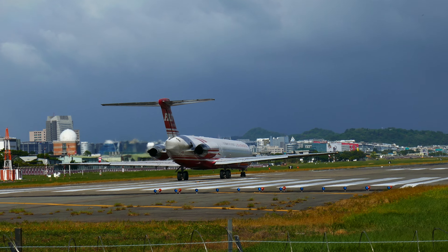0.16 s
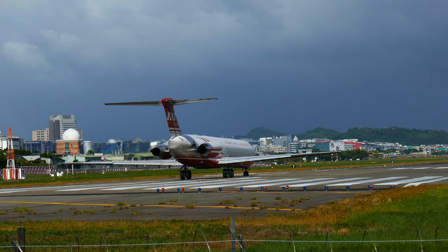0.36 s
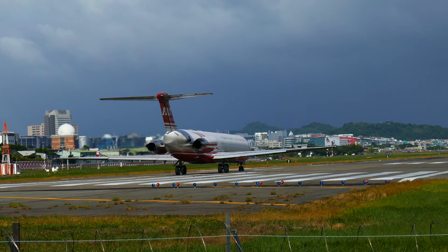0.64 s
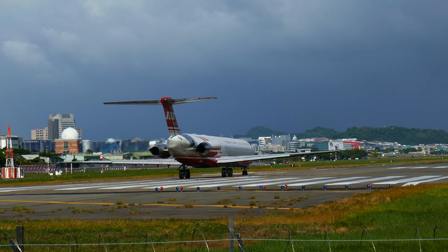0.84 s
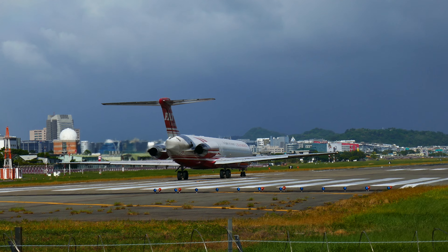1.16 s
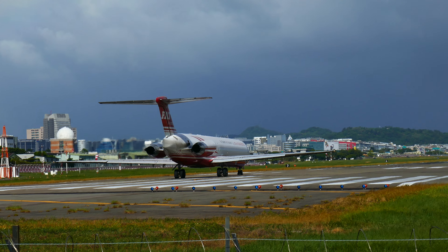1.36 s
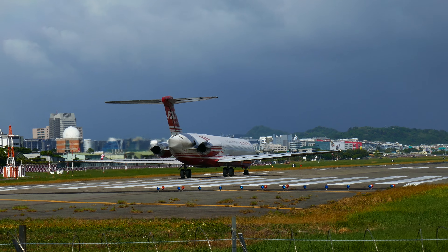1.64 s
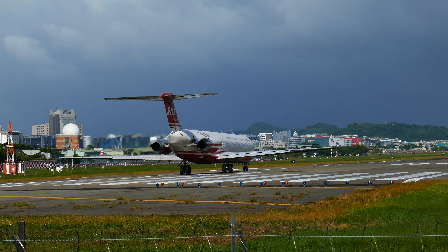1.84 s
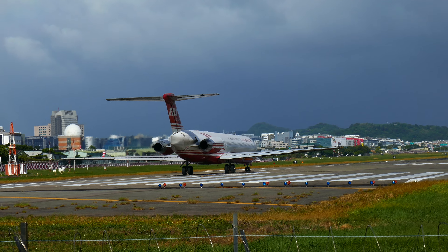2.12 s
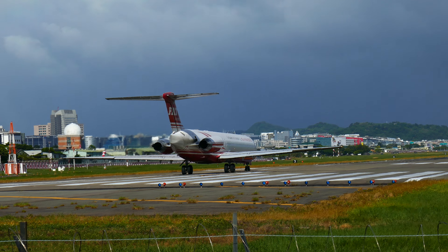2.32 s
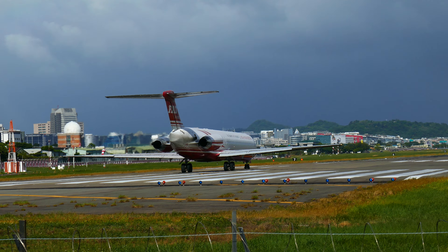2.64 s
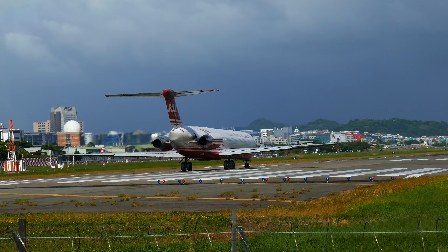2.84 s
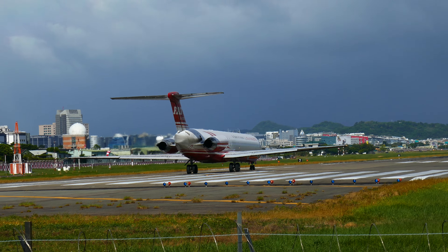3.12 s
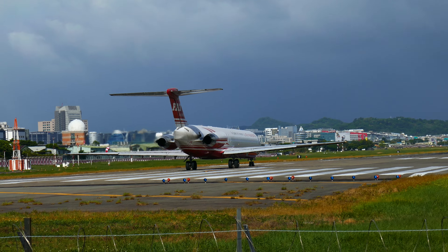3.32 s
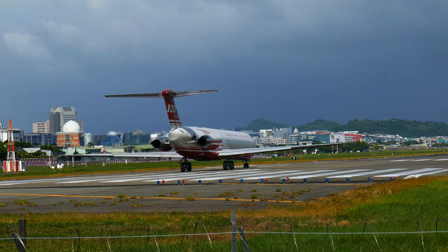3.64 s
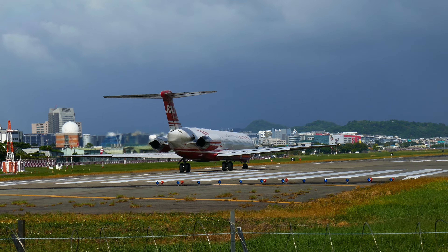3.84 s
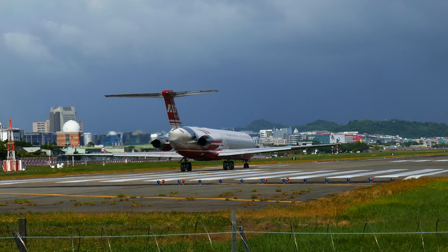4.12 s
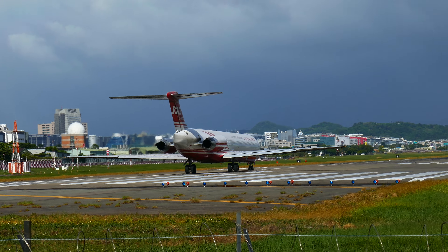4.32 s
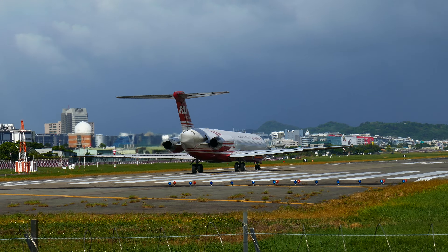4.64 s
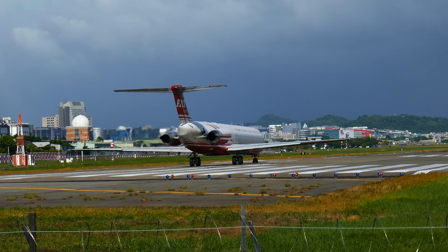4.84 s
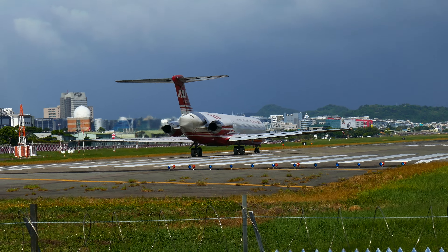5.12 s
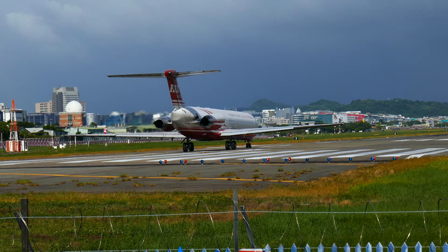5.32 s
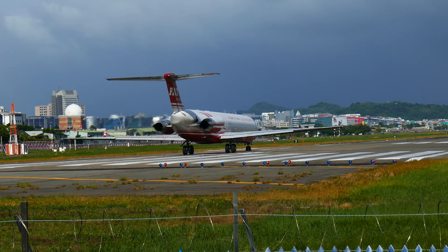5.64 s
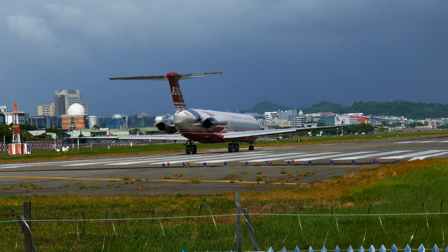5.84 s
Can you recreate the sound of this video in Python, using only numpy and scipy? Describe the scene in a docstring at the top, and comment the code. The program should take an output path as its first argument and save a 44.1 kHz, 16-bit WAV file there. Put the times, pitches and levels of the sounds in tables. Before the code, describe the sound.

A twin-engined airliner taxis on an open airfield, heard from some distance by a stereo microphone in gusty wind. Throughout, several close, steady-pitched whines around 1.7 to 2.4 kHz flicker independently, with fainter breathy overtones near 4 kHz, over broad fan hiss and a low-mid exhaust roar. From 0 to 1.3 s, dense low wind puffs thump and flap, strongest near 0.5 s, when the engine sound dips briefly and recovers. Wind eases from 1.5 to 2.3 s and the whine shows clearly. At 2.5 s a strong gust batters the microphone, with another brief dip, and buffeting continues to 3.4 s. Scattered thumps follow from 3.7 to 4.1 s, with a dip near 3.9 s. From about 4.6 s roar, hiss and whine swell, peaking around 5.6 to 5.9 s, the whine piercing. Isolated puffs come at 5.4 s and from 5.8 s to the end.

```python
"""Taxiing airliner in gusty wind

A twin-engined airliner taxis across an open airfield, heard at a stereo microphone in the wind.
Each compressor stage sings at shaft speed times its blade count, the two engines a little apart.
Shaped noise makes the exhaust roar and fan hiss beneath, which swell as the tail turns. Gusts buffet
the microphone ports in puffs; after some strong ones the recorder's gain drops briefly, heard in the
roar, the hiss and the tones riding on it."""
import sys
import numpy as np
from scipy import signal
from scipy.fft import rfft, irfft, next_fast_len
from scipy.io import wavfile
from scipy.ndimage import uniform_filter1d

SR = 44100
rng = np.random.default_rng(int(sys.argv[2]) if len(sys.argv) > 2 else 0)


def unload_wav(signal):
    """Save mono or channel-first audio to the path in sys.argv[1] as 16-bit WAV at rate SR, clipped to [-1, 1]."""
    wavfile.write(
        sys.argv[1],
        SR,
        np.round(np.clip(np.atleast_2d(signal).T, -1, 1) * 32767).astype(np.int16),
    )


N = 263718
NEAR_SHAFT_HZ, FAR_SHAFT_HZ = 70.9, 69.73   # the near engine is the louder


def from_db(db):
    """Decibels to gain."""
    return 10 ** (np.asarray(db) / 20)


def rms_one(x):
    """Scale to unit rms."""
    return x / np.sqrt(np.mean(x ** 2) + 1e-20)


def in_time(rows):
    """Columns of a curve table, one value per sample."""
    s, *columns = np.transpose(rows)
    return [np.interp(np.arange(N) / SR, s, column) for column in columns]


def at_hz(points, hz):
    """Read a spectrum on a log-frequency axis."""
    table_hz, values = np.array(points).T
    return np.interp(np.log(hz), np.log(table_hz), values)


def filtered(x, order, hz, kind):
    """Butterworth filter, run forward."""
    return signal.sosfilt(signal.butter(order, hz, kind, fs=SR, output="sos"), x)


def high_part(x, hz):
    """What lies above a frequency, without shifting it in time."""
    return signal.sosfiltfilt(signal.butter(2, hz, "high", fs=SR, output="sos"), x)


def drift(rate_hz):
    """Slow chance: noise through a double one-pole low-pass, run in; spread 1."""
    step = 40  # samples between drawn points
    r = np.exp(-2 * np.pi * rate_hz * step / SR)
    noise = rng.standard_normal(N // step + 2002)
    slow = signal.lfilter([1], [1, -2 * r, r * r], noise)[2000:]
    return np.interp(np.arange(N) / step, np.arange(len(slow)), rms_one(slow))


def coloured(spectrum, count):
    """Spectra of unrelated noises with the given colour, their frequencies and length."""
    size = next_fast_len(N)
    hz = np.maximum(np.arange(size // 2 + 1) * SR / size, 1)
    white = rfft(rng.standard_normal((count, size)))
    return white * from_db(at_hz(spectrum, hz)), hz, size


def tone(hz, waver_hz, level_db):
    """A blade-passing sine; the path through moving air shakes its phase."""
    cycles = np.cumsum(hz + waver_hz * drift(4)) / SR + rng.random()
    return np.sqrt(2) * from_db(level_db) * np.sin(2 * np.pi * cycles)


def twinkling_tones(shaft_hz, orders, over_db, level_db, waver_hz, twinkle_db):
    """Tones at multiples of shaft speed, each twinkling alone; higher ones waver more."""
    total = 0
    for order, db in zip(orders, over_db):
        tone_db = level_db + db + twinkle_db * drift(4)
        total = total + tone(order * shaft_hz, waver_hz * (order / 30) ** 2, tone_db)
    return total


# Loudest compressor stages of the near engine, 24, 28, 31 and 33 blades,
# swelling and fading in the moving air: (time [s], level [dB rms])
STAGE_24_BLADES = [(0.0, -55), (0.1, -48.5), (0.18, -63), (0.32, -45.5), (0.51, -52), (0.58, -62),
                   (0.9, -52.5), (1.2, -51.5), (1.3, -70), (1.33, -61), (1.55, -72), (1.63, -50),
                   (1.96, -59), (2.05, -48), (2.53, -52), (2.63, -70), (3.2, -48.5), (3.28, -68),
                   (3.6, -44.5), (4.38, -60), (4.41, -48), (4.63, -62), (4.88, -47.5), (5.3, -63),
                   (5.38, -42), (5.45, -56), (5.65, -32.5), (5.9, -40), (5.98, -60)]
STAGE_28_BLADES = [(0.0, -48), (0.13, -58), (0.23, -46), (0.7, -53), (0.75, -67), (0.98, -62), (1.15, -44),
                   (1.32, -45.5), (1.37, -55), (1.65, -47.5), (1.72, -71), (2.3, -47), (2.53, -52),
                   (3.46, -44), (3.7, -48.5), (3.81, -41), (4.18, -45.5), (4.4, -35), (4.46, -46.5),
                   (4.66, -36), (5.0, -37), (5.28, -53), (5.36, -37.5), (5.5, -71), (5.58, -45),
                   (5.93, -32), (5.98, -39)]
STAGE_31_BLADES = [(0.0, -53), (0.22, -44), (0.51, -71), (0.55, -75), (0.65, -48), (1.38, -63), (1.5, -44),
                   (1.82, -62), (1.9, -42.5), (2.16, -52), (2.25, -39.5), (2.46, -64), (2.65, -45),
                   (2.76, -66), (3.26, -45.5), (3.3, -55), (3.6, -41), (3.93, -52), (4.1, -39.5),
                   (4.63, -55), (4.75, -41.5), (4.88, -55), (5.03, -39), (5.09, -63), (5.3, -39),
                   (5.48, -75), (5.91, -37), (5.98, -41)]
STAGE_33_BLADES = [(0.0, -66), (0.1, -57), (0.17, -47), (0.3, -61), (0.51, -58), (0.58, -73), (1.01, -76),
                   (1.58, -47.5), (1.68, -57), (1.86, -49), (2.03, -66), (2.16, -43.5), (2.71, -53),
                   (2.75, -65), (3.51, -45.5), (3.61, -65), (3.71, -50), (3.78, -56), (3.83, -45),
                   (3.96, -57), (4.38, -50), (4.53, -41), (4.78, -47.5), (4.85, -38), (5.33, -52),
                   (5.56, -43), (5.68, -34.5), (5.98, -37.5)]


def loud_stages(waver_hz, flicker_db):
    """The stages that stand out of the whine: sines at blade count times shaft speed, swells rounded."""
    levels = []
    for stage in (STAGE_24_BLADES, STAGE_28_BLADES, STAGE_31_BLADES, STAGE_33_BLADES):
        s, db = np.transpose(stage)
        root_gain = np.interp(np.arange(N) / SR, s, from_db(db / 2))
        rounded = uniform_filter1d(root_gain, size=1500)  # samples
        levels.append(2 * 20 * np.log10(rounded))
    # the 34-blade stage swells with its neighbour, under it
    levels.append(levels[-1] - 8.5 + 3 * drift(2.5))
    total = 0
    for blades, db in zip((24, 28, 31, 33, 34), levels):
        total = total + tone(blades * NEAR_SHAFT_HZ, waver_hz, db + flicker_db * drift(6))
    return total


# Whine high over the blade tones:
# (time [s], level near 4 kHz that breath and overtones are set against [dB], highest overtones' level [dB])
UPPER_WHINE = [(0.0, -71, -75), (0.5, -70, -76), (0.78, -91, -88), (0.82, -72, -75), (0.95, -75, -80),
               (1.25, -70, -71), (1.45, -66, -68), (2.03, -71, -70), (2.16, -63, -62), (2.65, -73, -77),
               (3.51, -73, -76), (3.73, -61, -64), (3.95, -72, -80), (4.38, -60, -74), (4.6, -76, -81),
               (4.96, -59, -59), (5.2, -63, -59), (5.51, -59.5, -68), (5.7, -56.5, -61), (5.98, -63, -62)]


def upper_whine():
    """Overtones that hold their pitch but break up, inside a breathy band of noise."""
    level_db, top_db = in_time(UPPER_WHINE)
    lines = twinkling_tones(NEAR_SHAFT_HZ, (56, 62), (-4, -12), level_db, waver_hz=.5, twinkle_db=3.2)
    lines += twinkling_tones(FAR_SHAFT_HZ, (56,), (-7,), level_db, waver_hz=.5, twinkle_db=3.2)
    lines += twinkling_tones(NEAR_SHAFT_HZ, (64, 65, 66), (-5, 0, -2), top_db, waver_hz=.8, twinkle_db=3.5)
    breath_hz, width_hz, breath_db = 4280, 510, 5
    edges_hz = [breath_hz - width_hz / 2, breath_hz + width_hz / 2]
    breath = filtered(rng.standard_normal(N), 1, edges_hz, "band")
    return lines + from_db(level_db + breath_db) * rms_one(breath)


def fan_tones(hiss_db):
    """Blade tones of both engines that ride on the fan hiss and twinkle by chance."""
    near = twinkling_tones(NEAR_SHAFT_HZ, (39, 41, 48, 51), (-27, -26, -27, -28),
                           hiss_db, waver_hz=1.2, twinkle_db=4.0)
    far = twinkling_tones(FAR_SHAFT_HZ, (24, 28, 31, 33, 39), (-14, -12.5, -14.5, -9.5, -19),
                          hiss_db, waver_hz=2.2, twinkle_db=4.0)
    return near + far


# How alike the two microphone channels hear the engine noise: (frequency [Hz], left-right likeness [0 to 1])
CHANNEL_LIKENESS = [(60, 0.17), (150, 0.88), (380, 1), (940, 0.96), (1400, 0.9), (2360, 1), (5910, 0.79),
                    (14800, 0.54)]


def turbulent_noise(spectrum, patchy_db, low_hz, count):
    """Stereo noise in overlapping octave bands, wavering partly alone and partly together; rms 1."""
    (mid, side), hz, size = coloured(spectrum, count=2)
    alike = np.clip(at_hz(CHANNEL_LIKENESS, hz), 0, 1)
    mid, side = np.sqrt(1 + alike) * mid, np.sqrt(1 - alike) * side
    octave = np.clip(np.log2(hz / low_hz), 0, count - 1)
    out, together = 0, drift(5)
    for k in range(count):
        share = np.clip(1 - np.abs(octave - k), 0, 1)
        band = irfft([share * (mid + side), share * (mid - side)], size)[:, :N]
        out = out + band * from_db(patchy_db * (.8 * together + drift(10)))
    return rms_one(out)


# Top of the hiss against the rest of it: (time [s], level over or under the fan hiss [dB])
TREBLE_LEVEL = [(0, 0), (.8, 1), (1.3, -3), (1.9, 1), (2.4, 1), (3.0, 1), (4.0, 0), (4.9, -0.5), (5.5, 0),
                (5.98, -2.5)]


def treble_surges(hiss):
    """The top of the hiss swells and fades apart from the rest."""
    top = high_part(hiss, 7000)
    return hiss + (from_db(in_time(TREBLE_LEVEL)[0]) - 1) * top


# Colour of the fan hiss: (frequency [Hz], relative density [dB per Hz])
HISS_COLOUR = [(900, -25), (1150, -2.5), (1500, -2.5), (1730, -7), (1950, 0.5), (2300, 1), (2700, -3.5),
               (3000, -8), (3200, -7), (3900, -16), (4500, -14), (5000, -16.5), (6000, -23.5), (7200, -24),
               (8000, -28.5), (8700, -23.5), (9600, -21.5), (15000, -40.5)]


def fan_hiss(level_db):
    """Broadband hiss of the fans: patchy turbulence noise with a treble that surges."""
    noise = turbulent_noise(HISS_COLOUR, patchy_db=.83, low_hz=1040, count=5)
    return treble_surges(from_db(level_db) * noise)


# Colour of the exhaust roar: (frequency [Hz], relative density [dB per Hz])
ROAR_COLOUR = [(18, -85), (30, -72), (54, -58), (108, -22.5), (190, -24), (252, -6), (346, -3), (600, -0.5),
               (790, 1.5), (870, 2.5), (970, -1.5), (1000, -4.5), (1300, -15), (1690, -18.5), (2860, -120)]


def exhaust_roar(level_db):
    """Jet mixing with still air: patchy low noise."""
    return from_db(level_db) * turbulent_noise(ROAR_COLOUR, patchy_db=.85, low_hz=107, count=4)


# Colour of the wind on the microphone ports: (frequency [Hz], relative density [dB per Hz])
WIND_COLOUR = [(18, -84), (60, -22), (137, -8.5), (221, 0), (344, -5.5), (684, -20.5), (874, -13.5),
               (1120, -62), (1500, -22.5), (1950, -52), (3300, -120)]


def buffeting(level_db, lumpy_db):
    """Eddies on the ports: two unrelated lumpy low noises."""
    spectra, _, size = coloured(WIND_COLOUR, count=2)
    lumps = from_db(lumpy_db * drift(17.7))
    return from_db(level_db) * rms_one(lumps * irfft(spectra, size)[:, :N])


# Wind on the ports: (time [s], level [dB], left minus right before flapping [dB],
# middle pitch of the small puffs [Hz])
GUST_CURVES = [(0, -50.5, -3, 330), (0.4, -45, -12, 380), (0.65, -44, -4, 430), (1.15, -46, 16, 443),
               (1.35, -46, -9, 326), (1.6, -53, -10, 310), (1.9, -55, -5, 300), (2.3, -43, 0, 310),
               (2.49, -44.5, -1, 312), (2.53, -34.5, -1.5, 376), (2.8, -38.5, -9, 356),
               (2.84, -41, -4, 300), (2.9, -36.5, -7, 260), (3.04, -40.5, -5, 268), (3.09, -39, -6, 270),
               (3.2, -39.5, -2, 250), (3.33, -36, -3, 280), (3.4, -47.5, -7, 283), (3.6, -44.5, -11, 305),
               (3.85, -40.5, 1, 327), (4.05, -47, -6, 323), (4.3, -41.5, -5, 298), (5.0, -54, -5, 300),
               (5.5, -43, 1, 336), (5.76, -46.5, -3, 377), (5.98, -31, 0, 357)]


def wind():
    """Long waves reach both ports alike; shorter ones lean to the windward port, flap and partly differ."""
    level_db, pan_db, pitch_hz = in_time(GUST_CURVES)
    shared, own = buffeting(level_db, lumpy_db=3.0)
    small = small_puffs(level_db, pitch_hz)
    both = shared + puffs(small, slide=.3, edge_ratio=3.4, edge_s=.0004, rustle_db=-9.5)
    flapping_pan_db = pan_db + 6.5 * drift(33)
    # tanh turns a left-right difference in dB into side over mid
    lean = np.tanh(np.log(10) / 40 * flapping_pan_db) * both + from_db(-14.0) * own
    side = high_part(lean, 300)
    return filtered([both + side, both - side], 4, [120, 2800], "band")


def small_puffs(level_db, pitch_hz):
    """Chance puffs, their strength and pitch following the wind of the moment."""
    per_s, over_db, edge_db, width_ms = 70, 4, -14, 2.5
    place, weaker, higher = rng.random((round(per_s * N / SR), 3)).T
    i = (place * N).astype(int)
    peaks_db = level_db[i] + over_db - 7 * weaker
    centres_hz = pitch_hz[i] * (.8 + .4 * higher)
    widths_ms = width_ms * (.7 + weaker)
    return [*zip(i / SR, peaks_db, centres_hz, edge_db + 0 * place, widths_ms)]


# Strongest puffs on the ports: (crest time [s], peak level [dB], centre frequency [Hz],
# sharp edge relative to the peak [dB], width [ms])
STRONG_PUFFS = [(0.11, -34, 390, -15, 3.2), (0.166, -29.5, 281, -6, 4.2), (0.234, -23, 400, -14, 2.05),
                (0.299, -32.5, 313, -10, 6.3), (0.375, -26, 383, 1, 1.7), (0.383, -31, 333, -3, 5),
                (0.435, -30, 433, -24, 2.2), (0.444, -23.5, 370, -13, 2.9), (0.525, -29, 350, -24, 4),
                (0.542, -18.5, 363, -11.5, 2), (0.605, -33, 297, -20, 3.9), (0.639, -33, 465, -2, 4),
                (0.67, -29, 358, -22, 3.6), (0.692, -30.5, 343, -4, 11), (0.718, -23.5, 350, -6, 1.7),
                (0.737, -27, 294, -4, 5.8), (0.794, -32, 527, -14, 1.6), (0.83, -31, 440, -11, 2.3),
                (0.836, -28, 484, -7, 1.4), (0.862, -31, 394, -20, 6), (0.883, -33, 356, -26, 13),
                (0.9, -29, 390, -10, 2.3), (0.966, -36, 448, -14, 4.5), (0.975, -31.5, 500, -1, 3.4),
                (0.996, -24.5, 390, -6, 2.7), (1.008, -29.5, 473, -2, 6.3), (1.045, -26, 404, -16, 2.7),
                (1.072, -34, 405, -24, 2.8), (1.152, -25.5, 490, 0.5, 1.6), (1.162, -25, 330, -24, 2.1),
                (1.197, -25, 387, -7, 4.4), (1.238, -33.5, 350, -24, 4.9), (1.34, -35.5, 307, -24, 9.2),
                (1.489, -29.5, 350, -4, 3.5), (1.526, -34, 285, -9, 1.7), (1.754, -30.5, 290, -12, 1.5),
                (2.361, -28, 402, -22, 2), (2.53, -21.5, 366, -29.5, 2), (2.554, -21, 310, -18, 1.4),
                (2.58, -22, 416, -24, 2.7), (2.599, -26, 353, -20, 1.8), (2.608, -24, 360, -24, 2.1),
                (2.652, -26, 370, -16, 3.1), (2.675, -24, 300, -20, 1.9), (2.692, -22, 370, -9, 0.87),
                (2.706, -30, 360, -16, 4.2), (2.734, -23.5, 353, -19, 6.4), (2.773, -20.5, 370, -20, 1.6),
                (2.817, -21.5, 402, -20, 2.2), (2.879, -28.5, 288, -22, 9), (2.925, -30.5, 260, -22, 8.8),
                (2.996, -30.5, 323, -21, 16), (3.07, -32, 291, -20, 15), (3.145, -28, 258, -14, 5.1),
                (3.163, -23, 305, -11, 2.4), (3.198, -27.5, 304, -13, 5.2), (3.211, -26, 293, -22, 4.4),
                (3.252, -27, 326, -24, 12), (3.268, -28.5, 294, -21, 8.1), (3.293, -23, 330, -5, 5.3),
                (3.324, -28, 295, -24, 10), (3.461, -34, 326, -15, 4.0), (3.47, -27, 293, -24, 1.9),
                (3.711, -22, 430, -14, 3), (3.765, -30, 344, -18, 3.3), (3.822, -29, 363, -19, 1.6),
                (3.86, -24.5, 318, -27, 1.5), (3.875, -29.5, 337, -31, 4.5), (3.916, -31, 405, -19, 3),
                (3.955, -24, 450, -18, 1.6), (4.137, -25, 474, -16, 0.78), (4.597, -28.5, 252, -24, 8.5),
                (5.372, -24.5, 327, -16, 3.2), (5.831, -26.5, 346, -14, 2.9), (5.875, -25, 290, -34, 3.9),
                (5.906, -28, 438, -26, 1.9), (5.956, -20, 380, -16, 3.1), (5.969, -20, 385, -24, 1.8)]


def puffs(small, slide, edge_ratio, edge_s, rustle_db):
    """Each puff pushes then pulls, sliding in pitch, with a rustle and an edge higher when stronger."""
    rows = [*STRONG_PUFFS, *small]
    half = round(.03 * SR)
    t = np.arange(-half, half) / SR
    chance = rng.random((len(rows), 4))
    rustles = rms_one(filtered(rng.standard_normal((len(rows), len(t))), 2, 190, "low"))
    out = np.zeros(N + len(t))
    for (s, peak_db, centre_hz, edge_db, width_ms), (a, b, c, d), rustle in zip(rows, chance, rustles):
        u = t / (width_ms / 1000)
        turns = centre_hz * t * (1 + slide * (2 * b - 1) * np.tanh(u)) + .3 + .4 * a
        body = np.exp(-1.5 * u ** 2) * np.sin(2 * np.pi * turns)
        # low noise carried up to the puff's own pitch
        rustle_shape = np.exp(-(t / (.0052 + width_ms / 700)) ** 2)
        body += from_db(rustle_db) * rustle_shape * rustle * np.cos(2 * np.pi * centre_hz * t)
        edge_hz = edge_ratio * centre_hz * from_db(edge_db / 4) * (.9 + .2 * d)
        edge = np.exp(-(t / edge_s) ** 2) * np.sin(2 * np.pi * (edge_hz * t + c))
        i = round(s * SR)
        out[i:i + len(t)] += from_db(peak_db) * (body + from_db(edge_db) * edge)
    return out[half:half + N]


# Brief drops of the recorder's gain after strong puffs, heard in the roar, hiss and tones riding on it:
# (time [s], depth [dB])
GAIN_DIPS = [(0.544, 7), (0.74, 3.5), (2.55, 4), (3.86, 4.5)]


def gain_dips_db():
    """Each drop of the recorder's gain falls fast and recovers slowly, at listed times."""
    fall_s, recover_s = .0039, .41
    total = np.zeros(N)
    for s, depth_db in GAIN_DIPS:
        since = np.maximum(np.arange(N) / SR - s, 0)
        total -= depth_db * np.minimum(since / fall_s, 1) * np.exp(-since / recover_s)
    return total


# Broadband engine noise at the microphone, before the gain dips:
# (time [s], fan hiss level [dB], exhaust roar level [dB])
ENGINE_LEVELS = [(0, -49, -47), (0.5, -49.5, -47), (1.1, -47, -44.5), (1.48, -46.5, -50), (1.7, -47, -45),
                 (2.4, -44.5, -40), (3.3, -47.5, -45.5), (3.8, -43.5, -41), (4.6, -44, -40.5),
                 (4.88, -40.5, -37.5), (5.55, -39, -32.5), (5.72, -36, -32.5), (5.88, -35, -36),
                 (5.98, -41.5, -37.5)]


def scene():
    """Two engines, their roar and hiss, and the wind on the microphone."""
    hiss_db, roar_db = in_time(ENGINE_LEVELS) + gain_dips_db()
    whine = loud_stages(waver_hz=1.5, flicker_db=1.8) + upper_whine() + fan_tones(hiss_db)
    # the whine sways left and right; spread of left minus right 1.4 dB
    sway_db = 1.4 * drift(1.0) / 2
    swaying_whine = whine * from_db([sway_db, -sway_db])
    return swaying_whine + fan_hiss(hiss_db) + exhaust_roar(roar_db) + wind()


def record(dry):
    """A steep elliptic low-pass cuts the top above 15150 Hz."""
    return signal.sosfilt(signal.ellip(12, .5, 60, 15150, fs=SR, output="sos"), dry)


dry = scene()
out = record(dry)
unload_wav(out)
```